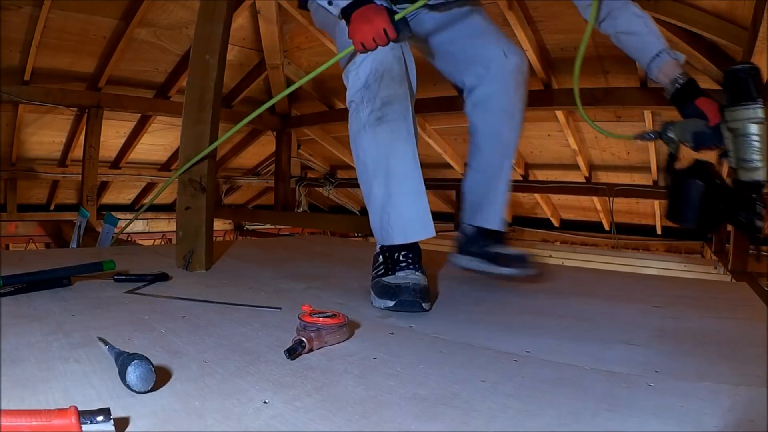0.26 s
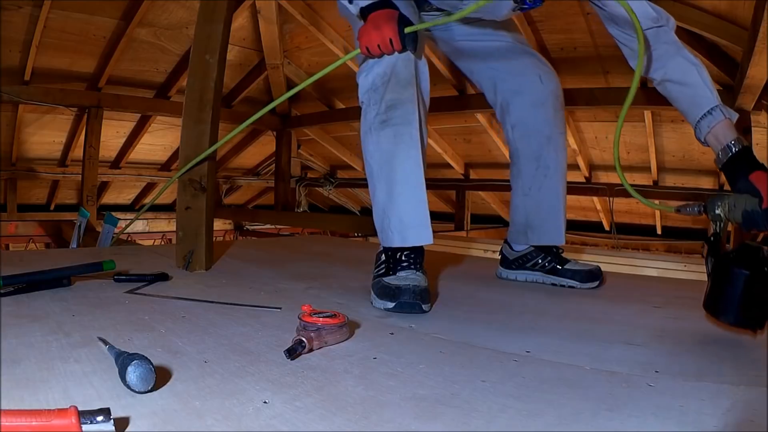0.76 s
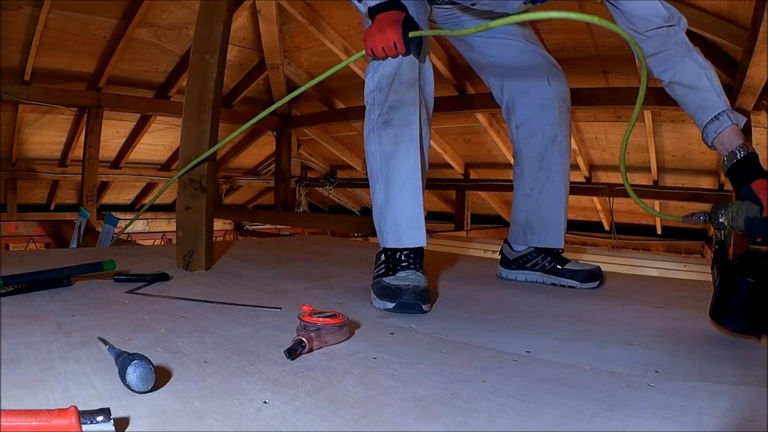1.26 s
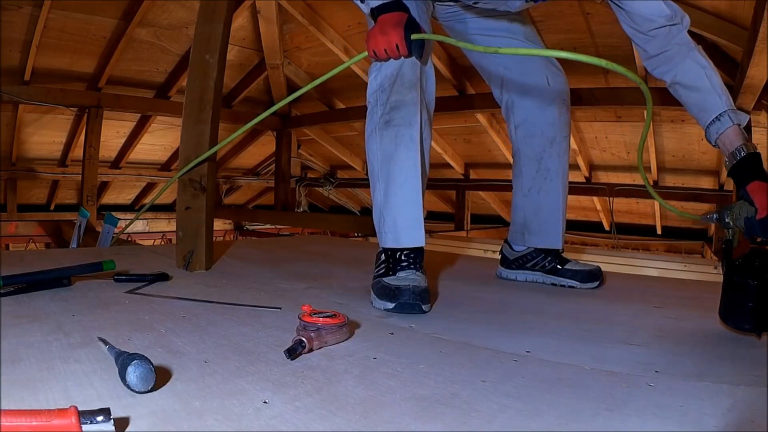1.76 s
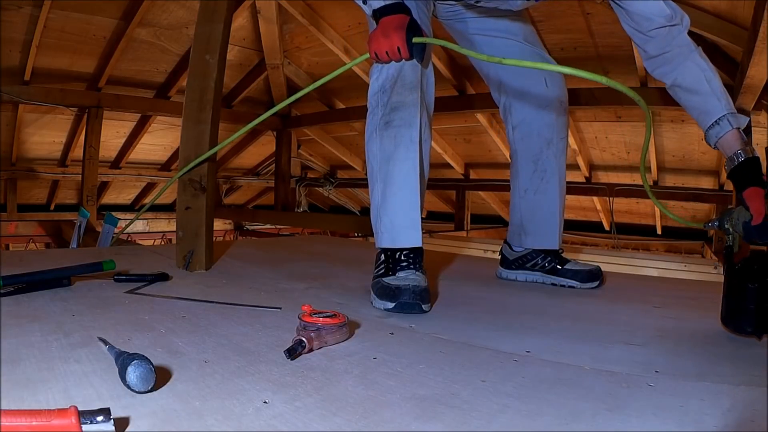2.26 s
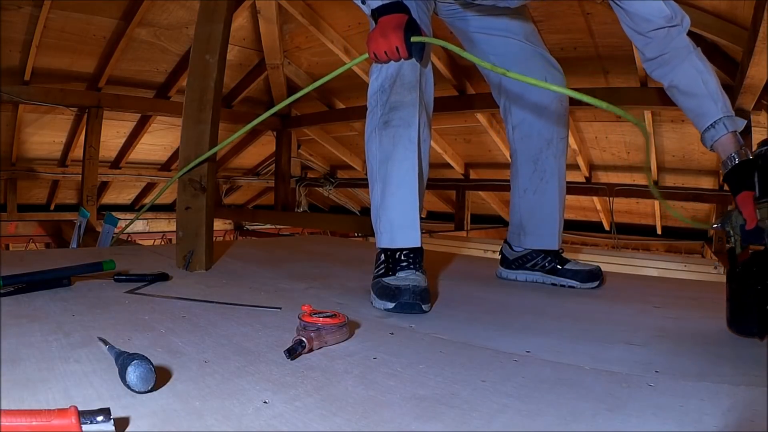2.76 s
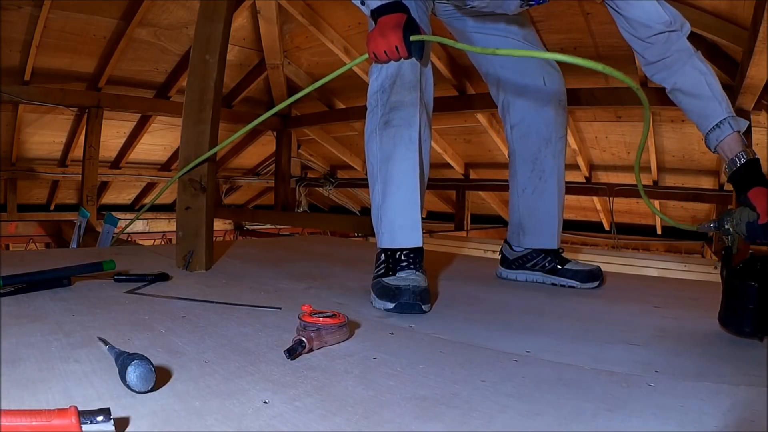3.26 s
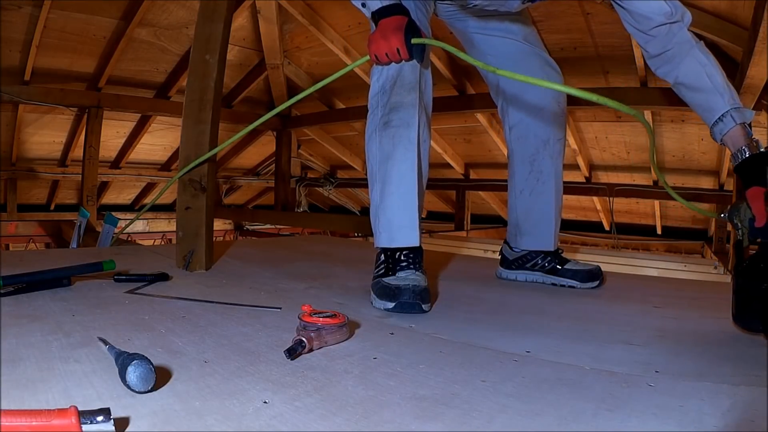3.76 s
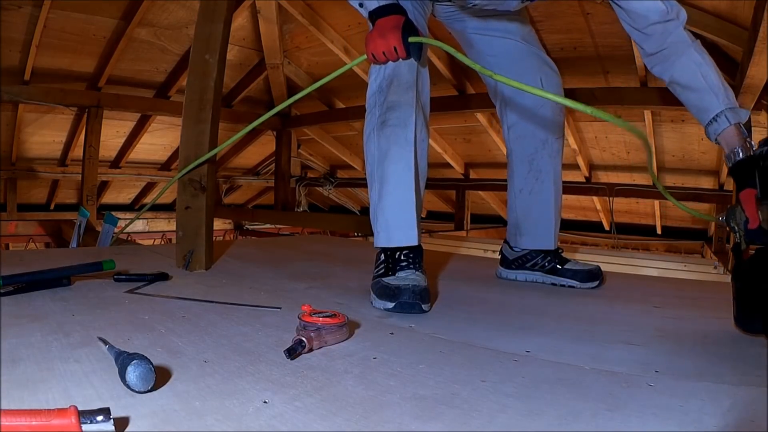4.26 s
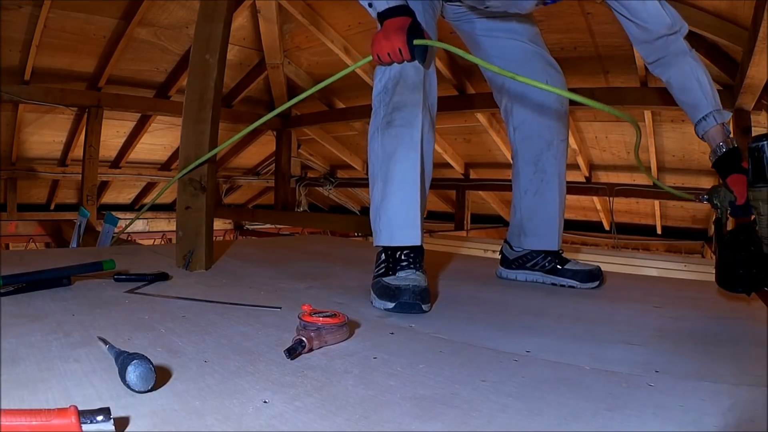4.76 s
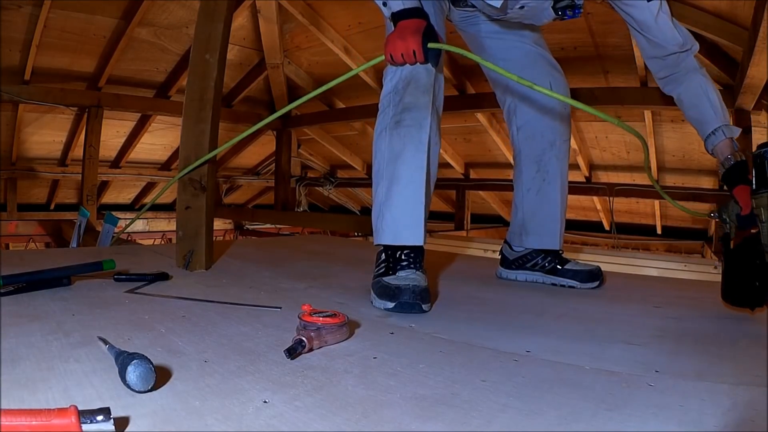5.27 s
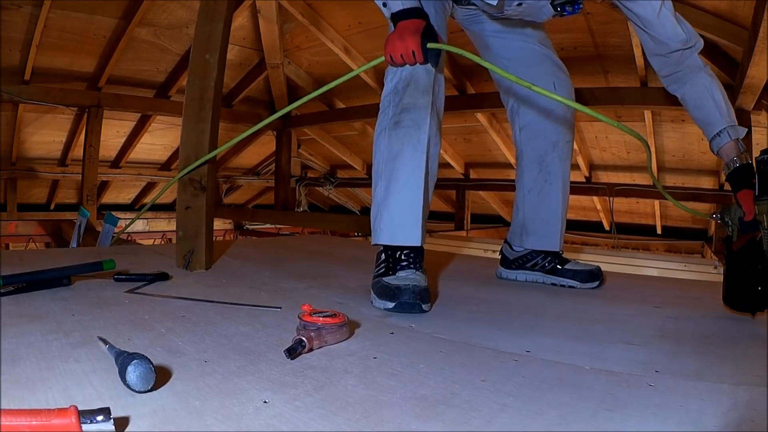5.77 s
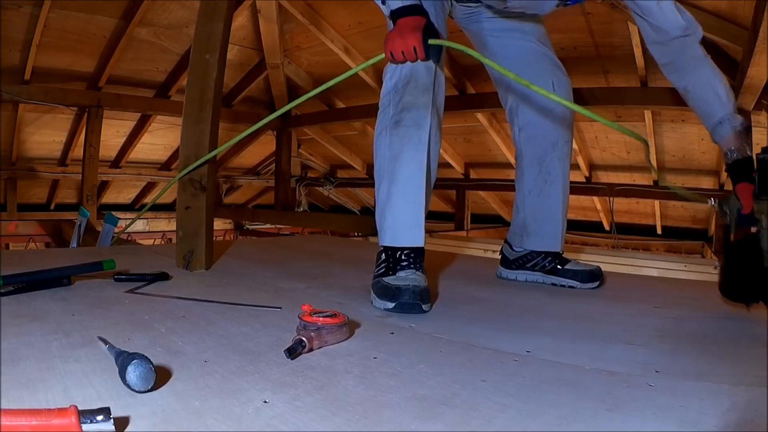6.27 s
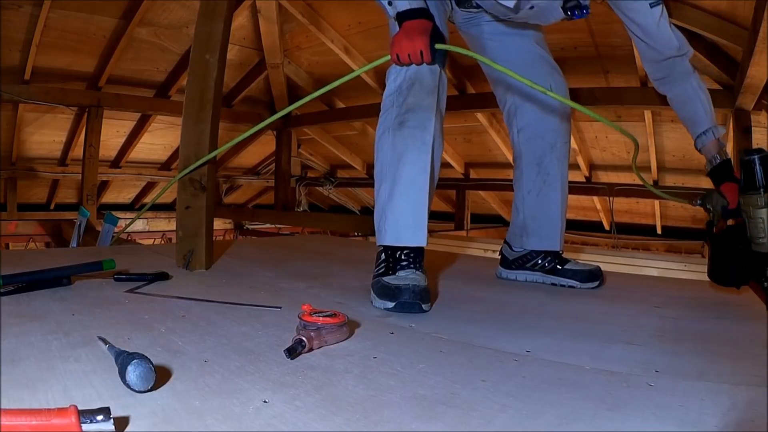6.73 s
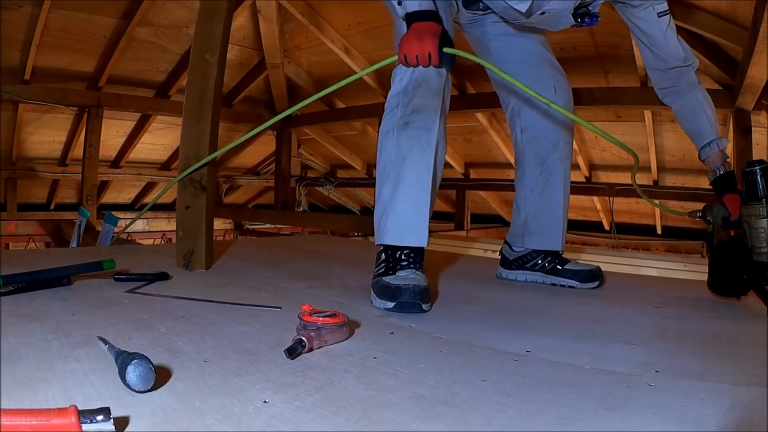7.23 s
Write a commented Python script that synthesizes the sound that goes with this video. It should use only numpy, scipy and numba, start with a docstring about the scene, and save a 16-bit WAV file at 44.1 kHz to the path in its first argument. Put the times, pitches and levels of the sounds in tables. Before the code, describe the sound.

Over a clattering compressor drone and faint hose hiss, soft footfalls scrape plywood before two explosive nail-gun blasts about two seconds apart.

```python
"""A pneumatic nailer drives two nails into a plywood floor in a timber loft, while an air compressor drones on.
Each shot is a one-cycle valve thump, noise bursts for inrush, blow, blast and exhaust, and the floor's ringing modes.
The compressor repeats one turn's clatter under loose rattle; a thin noise jet hisses at the hose coupling,
and soft shoes press and scrape the boards. The left microphone port resonates and overloads,
and a gain control ducks everything after each shot."""
import sys
import numpy as np
from scipy import signal
from scipy.fft import rfft, irfft
from scipy.io import wavfile
from scipy.ndimage import uniform_filter1d
from numba import njit

SR = 44100
rng = np.random.default_rng(int(sys.argv[2]) if len(sys.argv) > 2 else 0)


def bounce(signal):
    """Save signal as a 16-bit WAV file at the path given by the first command-line argument."""
    frames = np.transpose(np.atleast_2d(signal))
    limited = np.clip(frames, -1, 1)
    pcm = np.round(limited * 32767).astype(np.int16)
    wavfile.write(sys.argv[1], SR, pcm)


N = 330750
T = np.arange(N) / SR
HZ = np.arange(N // 2 + 1) * SR / N


def undb(db):
    """Turn dB into an amplitude factor."""
    return 10 ** (np.asarray(db) / 20)


def unit(x):
    """Scale to rms 1."""
    return x / np.sqrt(np.mean(x ** 2))


def along(points, hz):
    """Read (Hz, value) points on a log-frequency axis."""
    point_hz, value = np.transpose(points)
    return np.interp(np.log(hz + 1), np.log(point_hz), value)


def colour(x, db):
    """Filter by a gain in dB at every frequency."""
    return irfft(rfft(x) * undb(db), N)


def noise(db, alike_hz=500):
    """Stereo noise of the given dB per Hz; the two sides are alike well below alike_hz."""
    mid, side = rfft(rng.standard_normal((2, N)))
    alike = 1 / (1 + (HZ / alike_hz) ** 2)
    opposite = np.array([[1], [-1]])
    pair = mid * np.sqrt(1 + alike) + opposite * side * np.sqrt(1 - alike)
    return irfft(pair * undb(db), N) * np.sqrt(SR) / 2


def walk(rate):
    """Slow chance of rms near 1, heading for a new random value at the given rate per second."""
    hold = int(SR / rate)
    steps = np.repeat(rng.standard_normal(N // hold + 1), hold)
    return unit(uniform_filter1d(steps, hold)[:N])


def burst(start, rise, t60, hold=0):
    """An envelope that rises, holds and dies away; the hold, in seconds, counts from the start."""
    age = np.maximum(T - start, 0)
    decay = np.log(1000) * np.maximum(age - hold, 0) / t60
    return np.minimum(age / rise, 1) * np.exp(-np.minimum(decay, 50))


def casing(hz):
    """The lift in dB that the compressor casing's resonances give."""
    # Each row: centre in Hz, width in Hz, lift at the centre in dB.
    resonances = [(1963, 81, 11), (2410, 63, 16.5), (2484, 130, 8), (2740, 158, 9), (2871, 81, 12),
                  (3911, 94, 17.5), (4420, 33, 9), (7190, 220, 12)]
    return sum(db / (1 + (2 * (hz - centre) / width) ** 2) for centre, width, db in resonances)


def shaft(rms, chatter, turn):
    """One turn's clatter, with the given strength of each order, repeated as the shaft turns."""
    size = chatter.shape[1]
    phases = np.exp(1j * np.angle(rfft(chatter)))
    cycles = irfft(rms * phases) * size / np.sqrt(2)
    return np.array([np.interp(turn % 1, np.arange(size) / size, c, period=1) for c in cycles])


def compressor(size=4096, apart=0.38, wander=0.0002966, shimmer=0.057, surge=0.076):
    """Every shaft turn repeats one clatter with strong orders; loose rattle rings the casing on top."""
    # The strong orders. Each row: multiple of the shaft rate, relative level in dB.
    strong_orders = [(2, -60), (4, -63.5), (5, -58.5), (8, -59.5), (9, -40), (11, -44.5), (14, -54),
                     (16, -55), (28, -59.5), (31, -54), (32, -57.5), (33, -58.5), (34, -56), (36, -65.5),
                     (38, -61), (39, -64), (45, -65), (50, -56.5), (52, -63), (53, -53), (54, -62),
                     (55, -62.5), (60, -60.5), (67, -64.5), (69, -64.5), (84, -63), (99, -57), (102, -63),
                     (109, -69.5), (114, -63.5), (115, -62.5), (119, -60.5), (121, -60.5)]
    # Colour of the weaker orders, before the casing. Each row: frequency in Hz, relative level of each in dB.
    weak_orders = [(25, -89), (170, -66), (350, -58), (550, -72.5), (800, -67.5), (1720, -68.5),
                   (1790, -86), (2000, -73), (2160, -80), (2850, -79), (3300, -78.5), (4400, -76.5),
                   (5200, -100)]
    # Orders that swell or fade after the first shot. Each row: multiple of the shaft rate, change in dB.
    shifting_orders = [(33, 3.5), (37, -3), (38, 3.5), (45, 5), (50, -5.5), (67, 3)]
    # Colour of the unsteady rattle, before the casing. Each row: frequency in Hz, relative density in dB per Hz.
    rattle_colour = [(20, -89), (50, -74), (110, -78.5), (220, -77.5), (550, -85.5), (780, -82.5),
                     (1280, -87.5), (1750, -88), (2300, -97), (3200, -84.5), (4500, -88), (5500, -100),
                     (8000, -103), (14000, -125)]
    turn_hz = 24.107
    casing_share = 0.71  # how much of the casing's lift the weaker orders get
    shift_from_s, shift_takes_s = 4.3, 0.77

    turn = np.cumsum(turn_hz * (1 + wander * walk(5))) / SR
    chatter = rng.standard_normal((2, size))
    chatter[1] = chatter[0] + apart * chatter[1]  # the sides differ a little in phase

    order_hz = np.arange(size // 2 + 1) * turn_hz
    order_db = along(weak_orders, order_hz) + casing_share * casing(order_hz)
    shift_db = np.zeros_like(order_db)
    for multiple, db in strong_orders:
        order_db[round(multiple)] = db
    for multiple, db in shifting_orders:
        shift_db[round(multiple)] = db

    late = np.clip((T - shift_from_s) / shift_takes_s, 0, 1)
    early_drone = shaft(undb(order_db), chatter, turn)
    late_drone = shaft(undb(order_db + shift_db), chatter, turn)
    drone = (1 - late) * early_drone + late * late_drone

    # a slowly changing reflection lets the upper orders swell and fade one by one
    upper_orders = colour(drone, -40 / (1 + (HZ / 500) ** 4))
    reflection = np.roll(upper_orders, SR // 90, axis=1)
    drone = drone + shimmer * walk(1.49) * reflection

    strokes = 1 + surge * np.cos(6 * np.pi * turn)  # three surges a turn
    rattle = noise(along(rattle_colour, HZ) + casing(HZ), alike_hz=352) * strokes
    return undb(-0.62) * drone + undb(-2.0) * rattle


def waver(x, centre_hz=2650, width_hz=600):
    """The band of the casing's main resonances swells, sinks and flutters by chance."""
    buzz_db = -0.57
    swell_db, swells_per_s = 0.5, 2.5
    flutter_db, flutters_per_s = 0.96, 24
    band = irfft(rfft(x) / (1 + ((HZ - centre_hz) / width_hz) ** 4), N)
    db = buzz_db + swell_db * walk(swells_per_s) + flutter_db * walk(flutters_per_s)
    return x + band * (undb(db) - 1)


def leak(width_hz=1100, gain_db=2.0):
    """Air leaks at the hose coupling in a thin jet whose pitch shifts as the hose bends."""
    # Before and around the first shot. Each row: time in seconds, level in dB before gain_db, centre in Hz.
    early_bends = [(0.05, -57, 10400), (0.29, -56.5, 10700), (0.48, -57, 9810), (0.55, -54.5, 10500),
                   (0.72, -57.5, 10800), (0.83, -56.5, 9800), (1.43, -56.5, 9980), (2.69, -61, 10200),
                   (3.21, -55, 10350), (3.57, -60.5, 10000), (4.15, -61, 10100)]
    # Two later groups of bends. Each row: time in seconds, level in dB before gain_db, centre in Hz.
    later_bends = [
        [(5.2, -58, 10320), (6.05, -58, 10200)],
        [(7.1, -56.5, 10760), (7.45, -57.5, 10650)],
    ]
    s, db, hz = np.vstack([early_bends, *later_bends]).T
    band = np.exp(-.5 * (np.fft.fftfreq(N, 1 / SR) / width_hz) ** 2)
    white = rng.standard_normal((2, N)) + 1j * rng.standard_normal((2, N))
    jet = np.fft.ifft(band * np.fft.fft(white))
    # shift the narrow noise up to the moving centre
    turns = np.cumsum(np.interp(T, s, hz)) / SR
    hiss = (jet * np.exp(2j * np.pi * turns)).real
    return unit(hiss) * undb(np.interp(T, s, db) + gain_db)


def boards(force):
    """The modes of the plywood sheet and its joists answer a force."""
    # Each row: frequency in Hz, relative level in dB, t60 in seconds.
    modes = [(58, 1.5, 0.22), (94, -6, 0.13), (126.5, 0, 0.062), (188.4, -2, 0.24), (277, -2, 0.12),
             (349, 2, 0.072), (484, -8.5, 0.056), (1050, -41.5, .05)]
    t = T[:SR // 2]
    ring = sum(undb(db - 60 * t / t60) * np.sin(2 * np.pi * hz * t) for hz, db, t60 in modes)
    ring = ring / np.linalg.norm(ring)
    return signal.fftconvolve(force, ring[None], axes=1)[:, :N]


def shoes():
    """Soft soles press on the sheet, ringing its modes, and scrape over it."""
    # Shoes landing and shifting. Each row: start in seconds, relative level in dB,
    # time the weight takes to settle in seconds.
    steps = [(.47, -39, .17), (.754, -43, .05), (.929, -36, .01), (5.329, -48, .01), (5.789, -40, .01),
             (6.92, -38, .01), (7.139, -36, .01)]
    # Colour of a sole scraping the sheet. Each row: frequency in Hz, relative density in dB per Hz.
    sole_colour = [(100, -79), (300, -62.5), (600, -75), (1050, -78), (2000, -89), (4000, -84),
                   (6000, -105), (14000, -135)]
    # The scrapes. Each row: start in seconds, relative level in dB.
    scuffs = [(.575, -1.6), (.735, 2.2), (.805, -1.8), (.912, -1.2)]
    press = sum(undb(db) * burst(s, rise=.005, t60=0.35, hold=settle) for s, db, settle in steps)
    scrape = sum(undb(db) * burst(s, rise=0.0063, t60=0.27, hold=0.01) for s, db in scuffs)
    footfalls = boards(unit(noise(0 * HZ, alike_hz=90)) * press)
    return undb(-5) * footfalls + noise(along(sole_colour, HZ)) * scrape


def nailer(thump_hz=650, thump_db=-9, floor_db=-2):
    """The valve thumps, air rushes in, the driver slams the nail home, the cylinder vents, the nose drops back."""
    # Each row: valve opens, driver strikes, exhaust starts, nose knocks (all in seconds),
    # blow in dB, blast in dB, blast length in seconds, exhaust in dB, knock in dB (all levels relative).
    shots = [(4.2371, 4.2479, 4.319, 4.377, 3.5, 2, 0.049, 2, -23),
             (6.154, 6.1646, 6.266, 6.291, 3, 2.5, 0.057, 1.5, -22)]
    # Colours of a shot's parts. Each row: frequency in Hz, relative density in dB per Hz.
    inrush_colour = [(100, -73.5), (700, -48), (2000, -59), (4500, -53), (6000, -80), (10500, -51),
                     (13000, -70.5)]
    blow_colour = [(25, -75), (70, -29.5), (250, -22), (600, -24), (1500, -19.5), (3000, -19), (4500, -24),
                   (5800, -39), (8000, -52), (11000, -33), (13000, -75)]
    blast_colour = [(60, -53.5), (250, -36.5), (800, -31), (1700, -31), (2350, -29), (3100, -28),
                    (4400, -30), (5500, -55.5), (11000, -59), (13000, -95)]
    exhaust_colour = [(300, -74), (2000, -79), (4500, -50), (6500, -48.5), (9000, -43.5), (11200, -42),
                      (13000, -73)]
    colours = (inrush_colour, blow_colour, blast_colour, exhaust_colour)
    inrush, blow, blast, exhaust = (noise(along(points, HZ), alike_hz=710) for points in colours)
    out, force = 0, 0
    for valve, strike, vent, knock, blow_db, blast_db, length, vent_db, knock_db in shots:
        cycles = np.clip((T - valve) * thump_hz, 0, 1)  # a single cycle
        out = out + undb(thump_db) * np.sin(2 * np.pi * cycles)
        out = out + inrush * burst(valve, rise=0.00091, t60=.04, hold=strike - valve)
        out = out + undb(blast_db) * blast * burst(strike, rise=0.0052, t60=0.19, hold=length)
        out = out + undb(vent_db) * exhaust * burst(vent, rise=0.0015, t60=0.13, hold=0.0094)
        force = force + undb(blow_db) * burst(strike, rise=0.0023, t60=0.1, hold=0.0029)
        force = force + undb(knock_db) * burst(knock, rise=0.0023, t60=0.13)
    return out + blow * force + undb(floor_db) * boards(unit(blow) * force)


def loft(x, wet_db, rise_s):
    """Rafters scatter the sound into a dense tail whose decay time depends on the frequency."""
    # Each row: band centre in Hz, t60 in seconds.
    decays = [(60, 0.93), (250, 0.6), (1000, 0.61), (2500, 0.64), (5000, 0.54), (11000, 0.48)]
    t = T[:SR]
    hz = np.arange(SR // 2 + 1)
    scatter = rfft(rng.standard_normal((2, SR)))
    centres = np.log(np.array(decays)[:, 0])
    tail = 0
    for share, (_, t60) in zip(np.eye(len(decays)), decays):
        # neighbouring bands crossfade
        band = irfft(scatter * np.interp(np.log(hz + 1), centres, share), SR)
        tail = tail + band * np.exp(-np.log(1000) * t / t60)
    tail = unit(tail * np.minimum(t / rise_s, 1)) / np.sqrt(SR)
    return x + undb(wet_db) * signal.fftconvolve(x, tail, axes=1)[:, :N]


def scene():
    """The compressor and the leak stay dry; the nailer and the shoes ring in the loft."""
    background = waver(compressor()) + leak()
    return background + loft(nailer() + shoes(), wet_db=-15.5, rise_s=0.0083)


@njit
def duck(over_db, attack, release_db):
    """Gain reduction in dB: it chases any excess quickly and lets go at a steady rate."""
    cut, now = np.empty(len(over_db)), 0.
    for i in range(len(over_db)):
        if over_db[i] > now:
            now += (over_db[i] - now) * attack
        else:
            now = max(now - release_db, 0.)
        cut[i] = now
    return cut


def gain_control(x, threshold_db, attack_s, release_db_per_s=29):
    """Turn both channels down together when the sound passes the threshold."""
    over_db = 20 * np.log10(abs(x).max(axis=0) + 1e-9) - threshold_db
    cut_db = duck(over_db, 1 / (attack_s * SR), release_db_per_s / SR)
    return x * undb(-cut_db)


def left_port(x, early=4):
    """The port's resonance as a causal minimum-phase filter; sound reaches this side a few samples early."""
    # How much the left port passes over the right one. Each row: frequency in Hz, gain in dB.
    port_gain = [(50, 1.5), (120, 12.5), (220, 14.5), (700, 16.5), (1300, 16.5), (1800, 19.5), (2150, 24.5),
                 (2450, 28.5), (2850, 26.5), (3200, 11), (3900, 2), (5000, 2.5), (5800, 10.5), (9000, 7),
                 (11500, 1)]
    # folding the cepstrum onto positive times makes the filter causal
    cepstrum = irfft(np.log(undb(along(port_gain, HZ))), N)
    cepstrum[1:N // 2] *= 2
    cepstrum[N // 2:] = 0
    response = np.exp(rfft(cepstrum))
    return np.roll(irfft(rfft(x) * response, N), -early)


def record(dry, low_cut_hz=44, top_hz=15900):
    """Low cut, gain control, the left port's colour, hard overload and the top cut."""
    low_cut = signal.butter(2, low_cut_hz, "high", fs=SR, output="sos")
    left, right = gain_control(signal.sosfilt(low_cut, dry), threshold_db=-9.0, attack_s=0.008)
    clipped = np.clip([left_port(left), right], -1, 1)
    top_cut = signal.ellip(8, .2, 70, top_hz, fs=SR, output="sos")
    return np.clip(signal.sosfilt(top_cut, clipped), -1, 1)


dry = scene()
out = record(dry)
bounce(out)
```